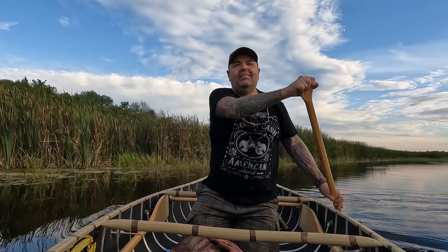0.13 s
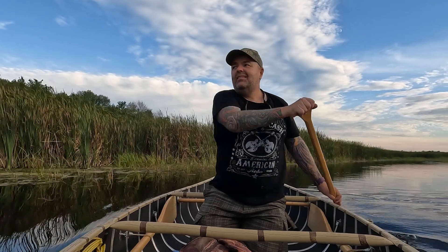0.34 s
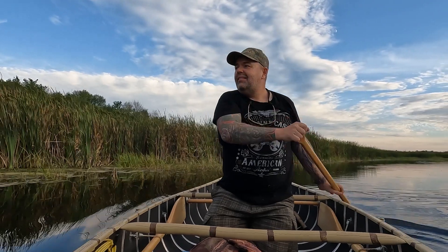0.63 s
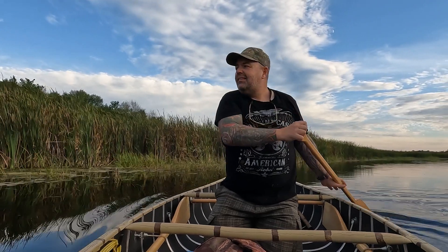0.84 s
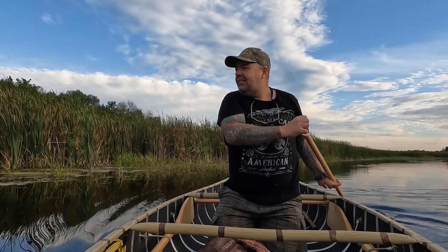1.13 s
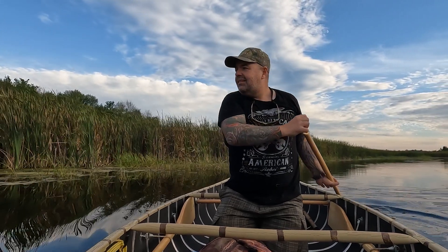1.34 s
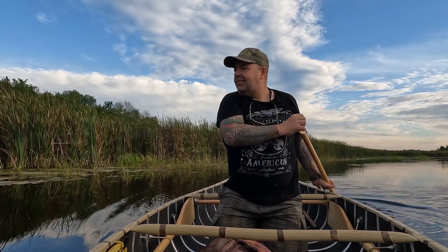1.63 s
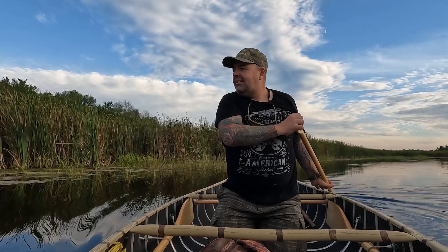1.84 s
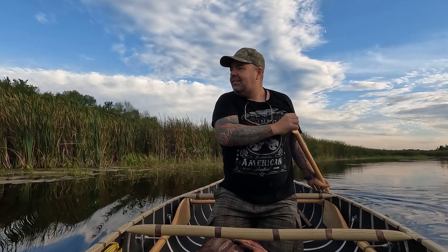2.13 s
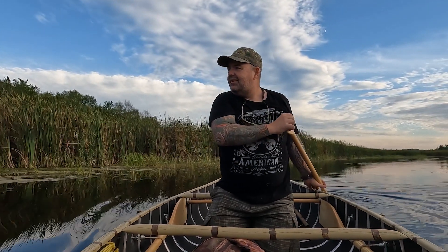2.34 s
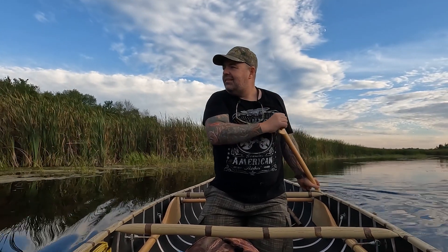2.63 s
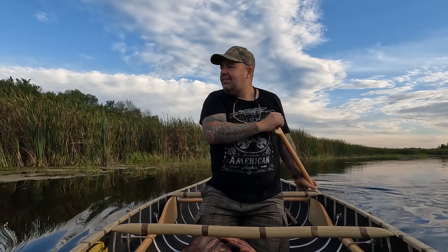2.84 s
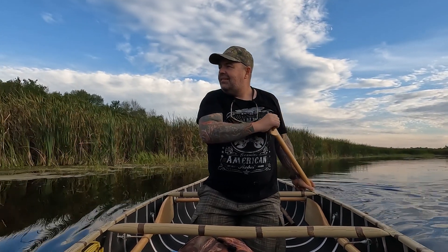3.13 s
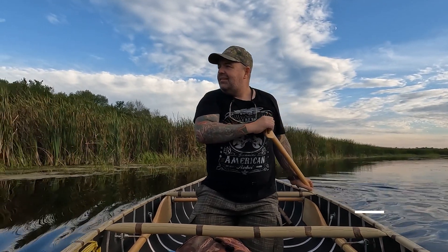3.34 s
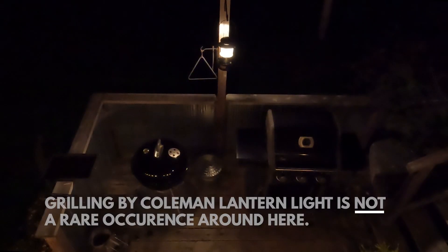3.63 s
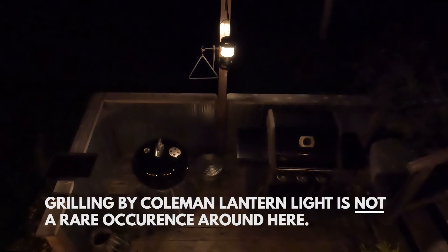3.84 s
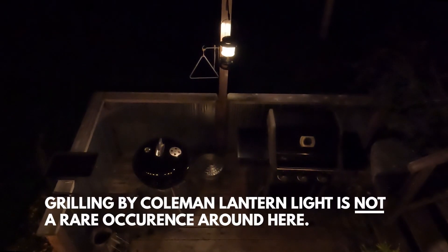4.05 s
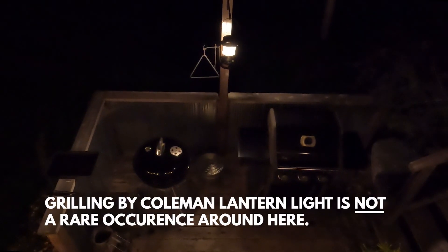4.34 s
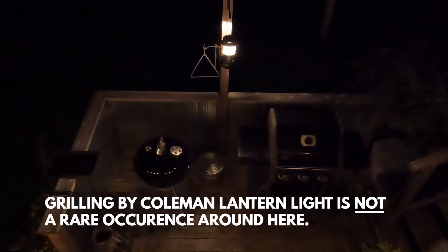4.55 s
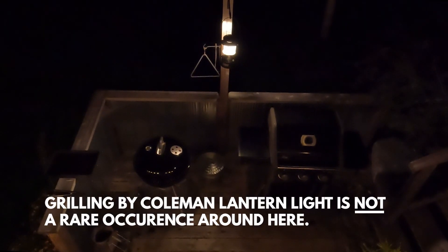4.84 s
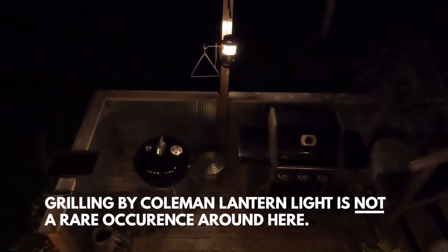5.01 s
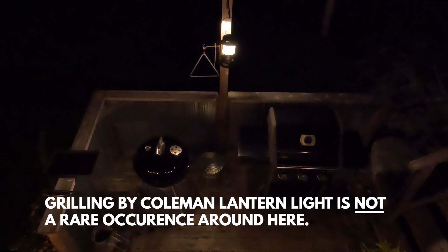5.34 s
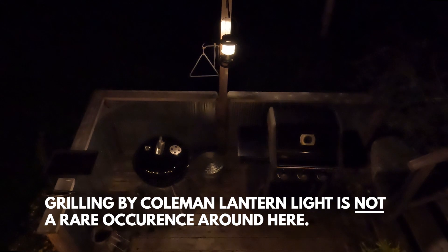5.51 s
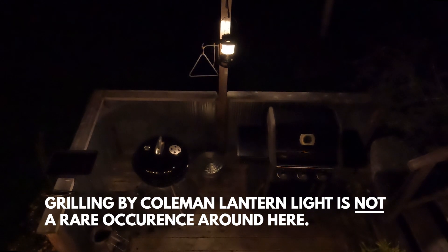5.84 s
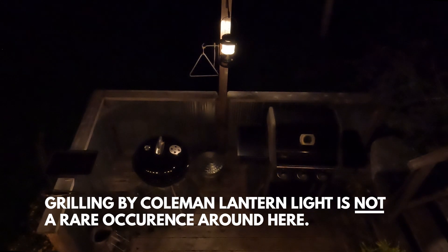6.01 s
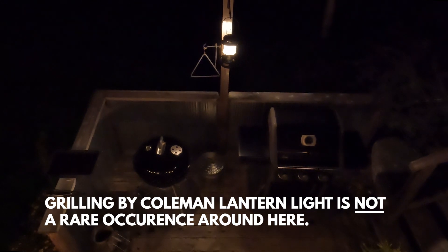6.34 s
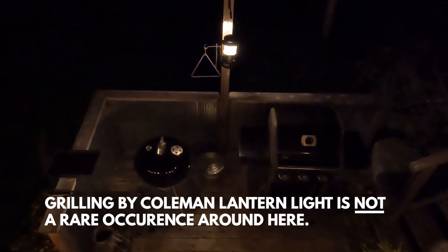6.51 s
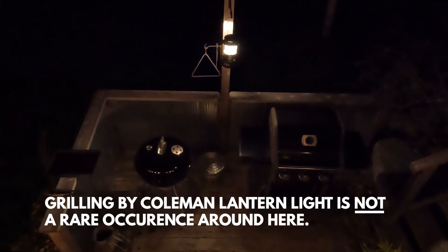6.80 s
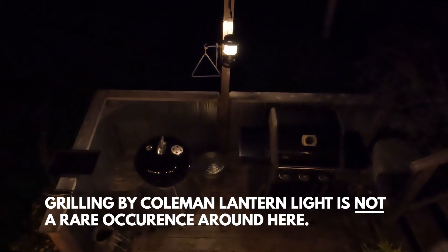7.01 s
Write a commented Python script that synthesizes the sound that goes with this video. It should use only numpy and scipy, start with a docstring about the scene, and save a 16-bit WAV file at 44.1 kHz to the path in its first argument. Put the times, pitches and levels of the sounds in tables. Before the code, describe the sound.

A canoe paddle pulls through marsh water close by, with gurgles, splashes and round plops, then a few drops fall from the blade. A bird repeats faint falling whistles over soft open air and a distant low hum. About halfway, the marsh fades into a porch at night, where crickets chirp in a loud, pulsing chorus, katydids buzz very high and a pressure lantern hisses steadily.

```python
"""A canoe paddle swirls, splashes and plops through marsh water: the sound of many ringing bubbles.
A bird gives falling whistles over soft open air and a far, low drone, while drops fall from the blade.
The marsh then fades into a porch at night, where insects sing by scraping their wings: tree crickets
trill in pulsed chirps, a field cricket chirps higher up and katydids buzz at the very top.
A pressure lantern hisses behind them."""
import sys
import numpy as np
from scipy import signal
from scipy.fft import rfft, irfft, next_fast_len
from scipy.io import wavfile
from scipy.ndimage import uniform_filter1d

SR = 44100
rng = np.random.default_rng(int(sys.argv[2]) if len(sys.argv) > 2 else 0)


def pcm_store(signal):
    """Save signal as 16-bit PCM."""
    levels = np.round(np.clip(np.atleast_2d(signal), -1, 1) * 32767)
    wavfile.write(sys.argv[1], SR, levels.astype(np.int16).T)


N = 316197
TIME = np.arange(N) / SR
NIGHT_FADE_IN_S, MARSH_FADE_OUT_S = (3.45, 4.05), (3.72, 4.5)


def from_db(db):
    """Turn decibels into a number to multiply by."""
    return 10 ** (np.asarray(db) / 20)


def rms_one(x):
    """Scale a sound so that its average power is 1."""
    return x / np.sqrt(np.mean(x ** 2) + 1e-20)


def in_time(rows):
    """Join a table's points in time with straight lines, one curve per level column."""
    s, *columns = np.transpose(rows)
    return [np.interp(TIME, s, c) for c in columns]


def add(out, s, sound):
    """Mix a short sound in, starting at s seconds."""
    at = int(round(s * SR))
    lo, hi = max(at, 0), min(at + len(sound), len(out))
    if hi > lo:
        out[lo:hi] += sound[lo - at:hi - at]


def filtered(x, spectrum):
    """Turn each frequency up or down by a table of (frequency [Hz], level [dB])."""
    hz, db = np.transpose(spectrum)
    size = next_fast_len(N + 4096)
    bins = np.maximum(np.fft.rfftfreq(size, 1 / SR), 1)
    gain = from_db(np.interp(np.log(bins), np.log(hz), db))
    return irfft(rfft(x, size) * gain, size)[:N]


def noise(spectrum):
    """Noise with the given tone colour, at power 1."""
    return rms_one(filtered(rng.standard_normal(N), spectrum))


def drift(per_s):
    """A random wobble, about 1 in size, that turns per_s times a second."""
    knots = rng.standard_normal(2048)
    return np.interp(TIME * per_s, np.arange(len(knots)), knots)


def echoed(x, echo_db, fade_s, count=120):
    """Add many weak echoes from leaves, reeds and boards."""
    delays = rng.uniform(.003, .6 * fade_s + .004, count)
    echoes = np.zeros(int(delays.max() * SR) + 2)
    strengths = rng.choice([-1, 1], count) * from_db(-60 * delays / fade_s)
    np.add.at(echoes, (delays * SR).astype(int), strengths)
    return x + from_db(echo_db) * signal.fftconvolve(x, echoes / np.linalg.norm(echoes))[:N]


def bubble(hz, cycles, rise):
    """A bubble rings and dies away; its pitch climbs as it nears the surface."""
    ring_s = cycles / hz
    t = np.arange(int(ring_s * SR) + 2) / SR
    loudness = from_db(-60 * t / ring_s) * (1 - np.exp(-2 * hz * t))
    return loudness * np.sin(2 * np.pi * hz * t * (1 + rise * t / ring_s))


def bubble_cloud(times, middle_hz, octaves, cycles, spread_db, length):
    """Bubbles of many sizes start at the given times; small, high ones are weaker."""
    out = np.zeros(int(length * SR))
    for s, (pitch, strength, life) in zip(times, rng.standard_normal((len(times), 3)).clip(-2, 2)):
        hz = min(middle_hz * 2 ** (octaves * pitch), SR / 5)
        gain = rng.choice([-1, 1]) * from_db(spread_db * strength - 1.5 * pitch)
        add(out, s, gain * bubble(hz, cycles * np.exp(.5 * life), rise=.25))
    return out


# how loud the stirred water is: (time [s], gurgle level [dB], spray level [dB])
CHURN_LEVELS = [(0.0, -36, -44.5), (0.312, -39, -48), (0.786, -39.5, -50), (1.002, -39, -44),
                (1.06, -37, -42), (1.226, -48, -51.5), (1.406, -51, -59), (1.7, -49, -50.5)]

def churn():
    """The blade stirs up gurgling, ringing bubbles and fine spray; then the water settles."""
    settle, end = 1.37, 1.9   # seconds
    gurgle = bubble_cloud(rng.uniform(0, end, 1800), 680, .915, cycles=13.6, spread_db=3, length=end)
    ringing = bubble_cloud(rng.uniform(0, end, 170), 906, .8, cycles=29.4, spread_db=3, length=end)
    strays = bubble_cloud(rng.uniform(0, end, 36), 597, .7, cycles=29, spread_db=1, length=end)
    spray = bubble_cloud(rng.uniform(0, end, 1500), 3080, .5, cycles=15.3, spread_db=4, length=end)
    swirl = sum(from_db(db) * rms_one(x) for x, db in [(gurgle, -1.5), (ringing, -3.5), (strays, -4)])
    gurgle_db, spray_db = (curve[:len(gurgle)] for curve in in_time(CHURN_LEVELS))
    out = np.zeros(N)
    add(out, 0, swirl * from_db(gurgle_db) + rms_one(spray) * from_db(spray_db))
    return out * np.interp(TIME, (settle, end), [1, 0])


# the blade's splashes: (time [s], length [s], level [dB], middle pitch [Hz])
SPLASHES = [(-.008, .031, -29, 1027), (0.021, 0.037, -36, 1720), (0.114, 0.0069, -29, 1170),
            (.151, .016, -36, 1090), (.171, .016, -34, 700), (.262, 0.034, -34, 696),
            (0.309, .034, -32, 785), (.482, 0.05, -30.5, 1060), (0.571, .034, -28.5, 1165),
            (0.579, 0.0043, -26.5, 1520), (.832, .019, -37, 1440), (.879, .008, -35.5, 2190),
            (.941, 0.0078, -36, 2680), (0.98, .063, -35, 1530), (1.123, 0.0074, -32, 1520),
            (1.15, .075, -36, 1100), (1.194, .012, -30.5, 940)]

def splashes():
    """Each splash is a quick burst of small bubbles."""
    out = np.zeros(N)
    for s, length, db, hz in SPLASHES:
        times = length * rng.beta(2, 2, size=50)
        burst = bubble_cloud(times, hz, octaves=.68, cycles=12, spread_db=3, length=length + .05)
        power = np.sum(burst ** 2) / (length * SR)
        add(out, s, from_db(db) * burst / np.sqrt(power))
    return out


# large bubbles: (time [s], level [dB], starting pitch [Hz], pitch rise [0-1])
PLOPS = [(.074, -13.5, 293, 0.36), (.086, -13, 1150, .1), (.118, -25, 395, .26), (.174, -21, 172, 0.02),
         (.274, -16.5, 537, 0.17), (.403, -21, 422, 0.38), (.496, -18, 810, 0.2), (.634, -23, 1040, .2),
         (.732, -21, 590, .05), (.921, -28, 900, 0.56), (.944, -21, 297, .73), (1.127, -15, 239, 0.18),
         (1.149, -15.5, 181, .17), (1.166, -19, 422, 0.9)]

def plops():
    """Each plop is one large bubble ringing briefly."""
    out = np.zeros(N)
    for s, db, hz, rise in PLOPS:
        add(out, s, from_db(db) * bubble(hz, cycles=16, rise=rise))
    return out


# drops from the blade: (time [s], bubble level [dB], bubble pitch [Hz], tick level [dB])
DRIPS = [(1.332, -45, 1690, -34), (1.473, -33.5, 2220, -38), (1.506, -36, 1002, -46),
         (1.643, -35, 2200, -47), (1.685, -46, 3180, -37), (2.474, -46.5, 1110, -52),
         (2.888, -46, 3700, -50), (3.038, -42, 2130, -56), (3.625, -42, 780, -56)]

def drips():
    """A drop ticks as it hits the water and traps a bubble that rings."""
    out = np.zeros(N)
    for s, db, hz, tick_db in DRIPS:
        tick = bubble_cloud(rng.uniform(0, .003, 8), 3300, .55, cycles=7, spread_db=1.5, length=.04)
        add(out, s, from_db(tick_db) * tick)
        add(out, s, from_db(db) * bubble(hz, cycles=57, rise=.15))
    return out


# tone colour of the water: (frequency [Hz], level [dB])
WATER_COLOUR = [(25, -28), (90, -16), (125, -21), (170, 1), (215, -6), (260, -1), (340, -3.5), (1000, 0),
                (4000, 2), (6500, 1.5), (8000, 3), (9100, -17), (10200, 11), (12500, 14), (14000, -24)]

def paddle():
    """All the water sounds of one stroke, with short echoes."""
    water = churn() + splashes() + plops() + drips()
    return filtered(echoed(water, echo_db=-14, fade_s=.09), WATER_COLOUR)


# tone colour of the air over the marsh: (frequency [Hz], level [dB])
AIR_COLOUR = [(25, -30), (60, -12), (120, -12.5), (300, -7), (600, -8), (1000, -15), (2200, -17.5),
              (3400, -15), (4100, -24.5), (5400, -21), (6000, -32.5), (7200, -35), (8800, -80),
              (11500, -55), (14000, -78)]

def open_air():
    """A soft, steady rush of outdoor noise."""
    return from_db(-55.5) * noise(AIR_COLOUR)


# the drone's notes: (pitch [Hz], width [Hz], level [dB])
DRONE_NOTES = [(82, 4.6, -4.5), (143.5, 17, -3), (178.4, 21, -3.5), (251.5, 10.3, -5.5), (312, 37, -9.5)]
# how loud the drone is: (time [s], level [dB])
DRONE_LEVEL = [(1.3, -53.5), (1.68, -50.5), (1.99, -57), (3.33, -47), (3.5, -52.5), (3.73, -47), (3.9, -51)]

def far_drone():
    """Noise rings at a few low pitches, making a hum that swells and sinks."""
    drone = np.zeros(N)
    for hz, width_hz, db in DRONE_NOTES:
        resonance = signal.iirpeak(hz, hz / width_hz, fs=SR)
        drone += from_db(db) * rms_one(signal.lfilter(*resonance, rng.standard_normal(N)))
    drone = signal.sosfilt(signal.butter(2, 70, "high", fs=SR, output="sos"), drone)
    level_db, = in_time(DRONE_LEVEL)
    return from_db(level_db) * rms_one(drone)


# the bird's whistles: (time [s], length [s], pitch [Hz], level [dB])
WHISTLES = [(.22, 0.36, 3640, -48), (.86, 0.33, 3680, -42.5), (1.51, 0.38, 3660, -45),
            (2.02, .3, 3830, -60), (2.204, .31, 3630, -42), (2.718, .2, 3500, -56),
            (3.021, 0.24, 3780, -55), (4.032, .27, 3590, -42.5)]

def bird():
    """A whistle slides up, falls and roughens; the voice box's other side sings a softer, lower line."""
    scoop_s, attack_s, release_s = .015, .021, .11
    out, waver = np.zeros(N), drift(500)
    for s, length, hz, db in WHISTLES:
        t = np.arange(int(length * SR)) / SR
        progress = t / length
        bend = 1 - .16 * np.exp(-t / scoop_s) - .33 * t - .04 * progress ** 10   # scoop, fall, droop
        roughness = 1 + .021 * np.sqrt(progress) * np.interp(s + t, TIME, waver)
        phase = 2 * np.pi * np.cumsum(hz * bend * roughness) / SR
        high_voice = np.sin(phase) + from_db(-27) * np.sin(2 * phase)
        low_voice = from_db(-6.5) * np.sin(.752 * phase)
        swell = np.minimum(t / attack_s, 1) * np.sqrt(np.minimum((length - t) / release_s, 1))
        add(out, s, from_db(db) * swell * (high_voice + low_voice))
    flutter = from_db(2 * drift(350))
    return from_db(-6.5) * echoed(out * flutter, echo_db=-8.5, fade_s=.39)


def wing_stroke(hz, length, sag, droop, octave_db):
    """One wing scrapes along the other's teeth and slows: the pitch sags, then droops at the end."""
    progress = np.linspace(0, 1, int(length * SR))
    pitch = hz * (1 - sag * (progress - .5) - droop * progress ** 6)
    phase = 2 * np.pi * (np.cumsum(pitch) / SR + rng.random())
    swell = np.abs(np.sin(np.pi * progress)) ** .51
    return swell * (np.sin(phase) + from_db(octave_db) * np.sin(2 * phase))


def scrape(strokes, length, sag, droop, octave_db, uneven_db, jitter_s):
    """Play wing strokes (time [s], pitch [Hz], level [dB]), each slightly different."""
    out = np.zeros(N)
    for (s, hz, db), (late, strong, sharp) in zip(strokes, rng.standard_normal((len(strokes), 3))):
        stroke = wing_stroke(hz * (1 + .006 * sharp), length, sag, droop, octave_db)
        add(out, s - length / 2 + jitter_s * late, from_db(db + uneven_db * strong) * stroke)
    return out


def on_the_beat(singers, swell_db):
    """List the strokes of insects that chirp regularly; each chirp is loudest in its middle."""
    return [(start + t, hz, db - swell_db * (2 * t / length - 1) ** 2)
            for first, every, length, per_s, hz, db in singers
            for start in np.arange(first, N / SR, every)
            for t in np.arange(0, length, 1 / per_s)]


# the nearest tree cricket's chirps: (time [s], strokes [count], level [dB])
NEAR_CHIRPS = [(3.479, 8, -20), (3.985, 5, -21.5), (4.459, 5, -21), (4.892, 5, -19.5), (5.315, 8, -19.5),
               (5.822, 5, -20), (6.295, 5, -22), (6.729, 5, -19.5), (7.151, 5, -20.5)]
# its neighbours: (first chirp [s], repeat time [s], length [s], strokes [per s], pitch [Hz], level [dB])
NEIGHBOURS = [(3.57, .609, 0.22, 32, 1882, -24.8), (3.77, .523, .26, 43, 2500, -24.2),
              (3.73, .675, 0.38, 34, 2056, -27.5)]
# far tree crickets that never pause: (strokes [per s], pitch [Hz], level [dB])
FAR_TRILLS = [(44.07, 2040, -37), (35.98, 2150, -42.5), (40.25, 2500, -43.5), (38, 2400, -48),
              (32.65, 1850, -46.5), (27.1, 2830, -42), (20.89, 2930, -44.5), (41.3, 2680, -49)]

def tree_crickets():
    """One close singer leads; its neighbours keep their own beats over far, blurred trills."""
    lead_hz, stroke_s, pause_s = 2308, .024, .006
    # strokes come as a pair, then in threes, with tiny pauses between; the first is 2 dB softer
    lead = [(s + k * stroke_s + (k + 1) // 3 * pause_s, lead_hz, db - 2 * (k == 0))
            for s, count, db in NEAR_CHIRPS for k in range(round(count))]
    endless = [(s, hz, db) for per_s, hz, db in FAR_TRILLS
               for s in np.arange(NIGHT_FADE_IN_S[0], N / SR, 1 / per_s)]
    near = scrape(lead, length=.0182, sag=.072, droop=.056, octave_db=-34, uneven_db=.9, jitter_s=.0006)
    around = scrape(on_the_beat(NEIGHBOURS, swell_db=5),
                    length=.021, sag=.065, droop=.057, octave_db=-18, uneven_db=1.66, jitter_s=.0015)
    far = scrape(endless, length=.018, sag=.086, droop=.029, octave_db=-22.5, uneven_db=2, jitter_s=.003)
    return (from_db(-1.2) * echoed(near, echo_db=-4.5, fade_s=.25)
            + from_db(-4) * echoed(around, echo_db=-5.5, fade_s=.3)
            + from_db(-1) * echoed(far, echo_db=-3, fade_s=.4))


def buzz(strokes_per_s, top_hz, bottom_hz, sweep_s, wing):
    """Very fast wing beats, each a brief downward slide in pitch, with close echoes."""
    beats = np.cumsum(strokes_per_s * (1 + .012 * drift(12))) / SR
    t = np.minimum(beats % 1 / strokes_per_s, sweep_s)   # time within each beat
    phase = 2 * np.pi * t * (top_hz - (top_hz - bottom_hz) * t / sweep_s / 2)
    sweeps = np.sin(np.pi * t / sweep_s) * np.sin(phase) * from_db(1.6 * drift(130))
    return rms_one(filtered(echoed(sweeps, echo_db=-12, fade_s=.02), wing))


# tone colours of two katydids' wings and of a far rasp: (frequency [Hz], level [dB])
NEAR_WING = [(7000, -17), (9000, -12), (9600, 1.5), (10200, -12), (10680, -1), (11020, -2), (11420, 6),
             (11850, -1), (12500, 2), (13500, -16)]
STEADY_WING = [(7000, -20), (8600, -2.5), (9600, 1), (10150, -9), (10700, 3.5), (11050, -2), (11450, 0.5),
               (11850, -5), (12500, -4), (13500, -14)]
RASP_COLOUR = [(5000, -28), (6800, -1.5), (7700, 2), (9000, -3), (11000, -3.5), (13000, -21), (15800, -17)]

def katydids():
    """One buzzes its wings in swelling phrases, one without pause; a far one rasps in quick throbs."""
    start_s, every_s, length_s, swell_db, gap_db = 3.45, .391, .328, 3.5, -7
    progress = (TIME - start_s) % every_s / length_s
    phrase_db = np.where(progress < 1, swell_db * (progress - .5), gap_db)
    phrases = uniform_filter1d(from_db(phrase_db), size=300)
    near = buzz(strokes_per_s=132.6, top_hz=13300, bottom_hz=7800, sweep_s=.00222, wing=NEAR_WING)
    steady = buzz(strokes_per_s=136, top_hz=13550, bottom_hz=7450, sweep_s=.0021, wing=STEADY_WING)
    throb_hz = 16 * (1 + .1656 * drift(7.6))
    throb = from_db(7 * np.sin(2 * np.pi * np.cumsum(throb_hz) / SR))
    rasp = rms_one(throb * noise(RASP_COLOUR))
    flicker = from_db(1.4 * drift(60))
    return from_db(-43.5) * phrases * near + from_db(-46) * flicker * steady + from_db(-46.5) * rasp


# tone colour of the lantern and far insects: (frequency [Hz], level [dB])
HISS_COLOUR = [(25, -6), (55, -16.5), (100, -8.5), (170, -18.5), (330, -18), (650, -8.5), (1450, -11),
               (2200, 10.5), (3350, -17), (4400, -4), (5600, 4.5), (6700, -6), (7500, -19.5), (10000, -8.5),
               (13500, -18.5), (16000, -37)]

def night_hiss():
    """The lantern's steady jet blends with countless far insects."""
    return from_db(-36.5) * noise(HISS_COLOUR) * from_db(drift(70))


# the field cricket: (main run start [s], strokes [count], lead-in strokes [count], lead-in spacing [s])
FIELD_CHIRPS = [(3.804, 5, 2, .017), (4.325, 5, 2, .024), (5.153, 5, 3, .019), (5.709, 4, 2, .033),
                (6.126, 5, 2, .026), (6.582, 5, 3, .018), (6.71, 1, 0, 0)]
# far answers: (first chirp [s], repeat time [s], length [s], strokes [per s], pitch [Hz], level [dB])
FIELD_ANSWERS = [(3.46, .478, .22, 45, 4524, -36), (3.68, 0.98, .2, 37, 4520, -33.5)]

def field_crickets():
    """A few lower wing strokes lead into an even run; distant answers are blurred by echoes."""
    lead_hz, lead_db = 4490, -26.5
    run_hz, run_db, stroke_s = 4595, -24, .0213
    strokes = []
    for s, count, lead_count, spacing in FIELD_CHIRPS:
        strokes += [(s - (k + 1) * spacing, lead_hz, lead_db) for k in range(lead_count)]
        strokes += [(s + k * stroke_s, run_hz, run_db) for k in range(count)]
    song = scrape(strokes,
                  length=.0135, sag=.034, droop=.075, octave_db=-36, uneven_db=.66, jitter_s=.00045)
    answers = scrape(on_the_beat(FIELD_ANSWERS, swell_db=3),
                     length=.014, sag=.056, droop=.071, octave_db=-36, uneven_db=3, jitter_s=.003)
    return (from_db(-.6) * echoed(song, echo_db=-15, fade_s=.16)
            + from_db(-2.5) * echoed(answers, echo_db=-3.5, fade_s=.2))


# a tiny insect: (first chirp [s], repeat time [s], length [s], strokes [per s], pitch [Hz], level [dB])
TINY_CHIRPS = [(3.85, .515, .19, 45, 15600, -55)]

def tiny_insect():
    """Faint wing strokes, almost too high to hear."""
    return scrape(on_the_beat(TINY_CHIRPS, swell_db=3),
                  length=.01, sag=.03, droop=.02, octave_db=-80, uneven_db=2, jitter_s=.001)


def scene():
    """The marsh fades out as the night fades in."""
    marsh = paddle() + open_air() + far_drone() + bird()
    night = tree_crickets() + katydids() + night_hiss() + field_crickets() + tiny_insect()
    marsh *= np.interp(TIME, MARSH_FADE_OUT_S, [1, 0])
    night *= np.interp(TIME, NIGHT_FADE_IN_S, [0, 1])
    return (marsh + night)[None]


def record(dry):
    """Steeply cut away the very highest treble, above 15900 Hz."""
    return signal.sosfilt(signal.ellip(12, .1, 90, 15900, fs=SR, output="sos"), dry)


dry = scene()
out = record(dry)
pcm_store(out)
```